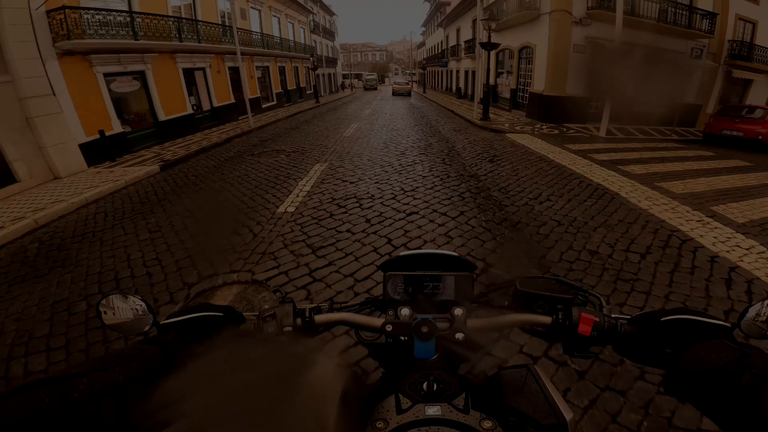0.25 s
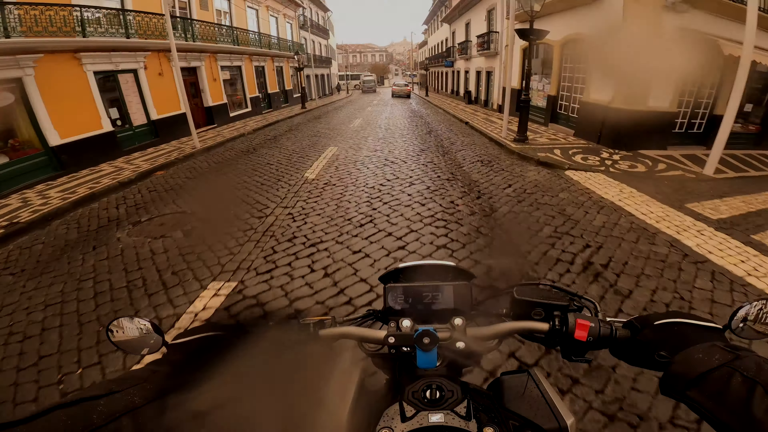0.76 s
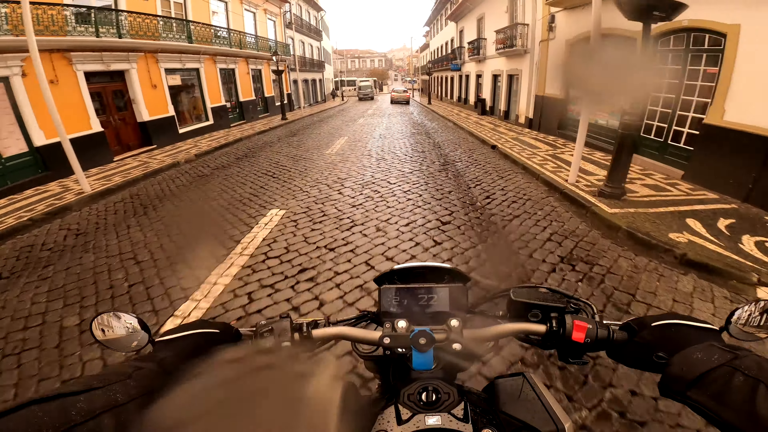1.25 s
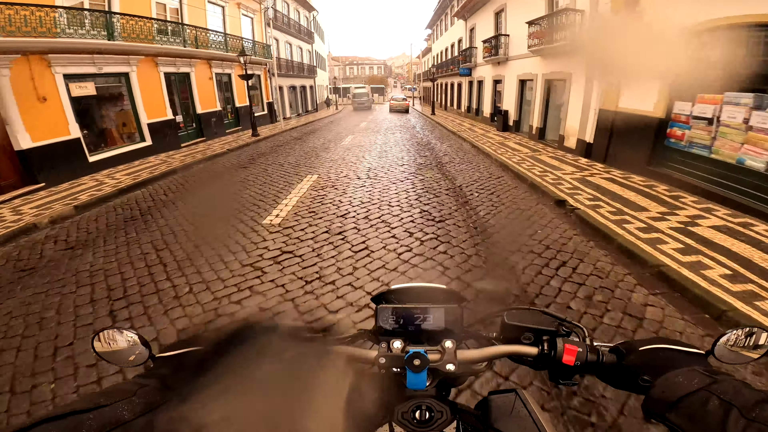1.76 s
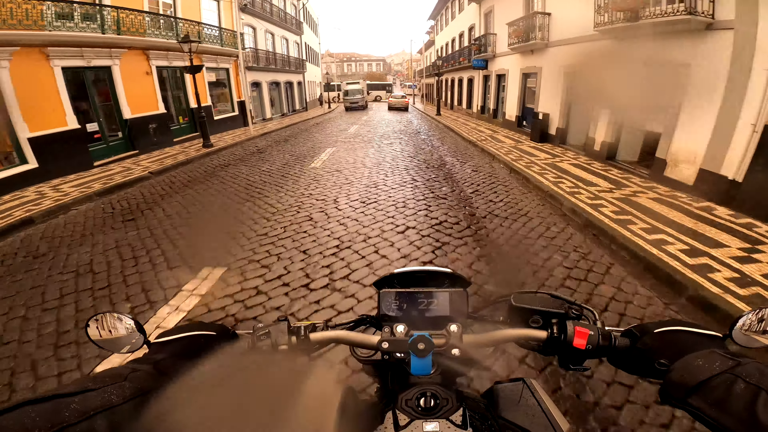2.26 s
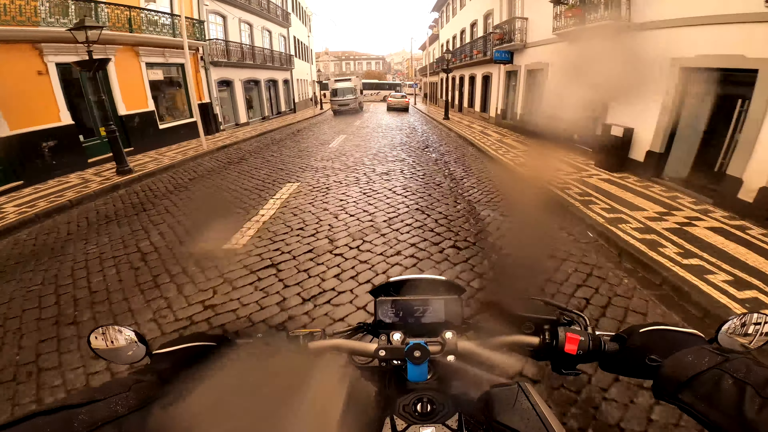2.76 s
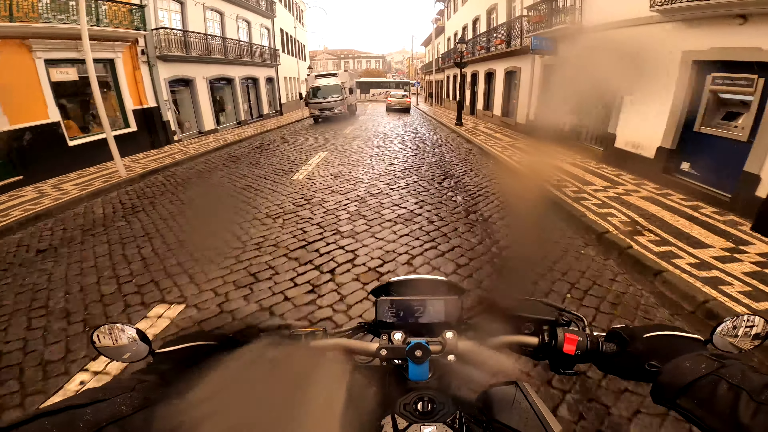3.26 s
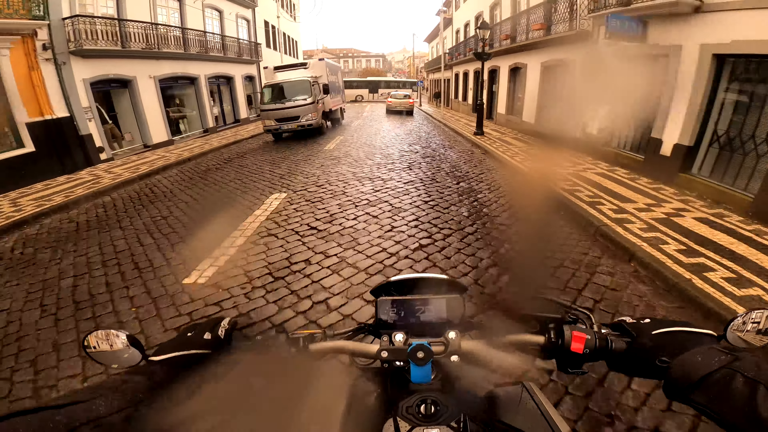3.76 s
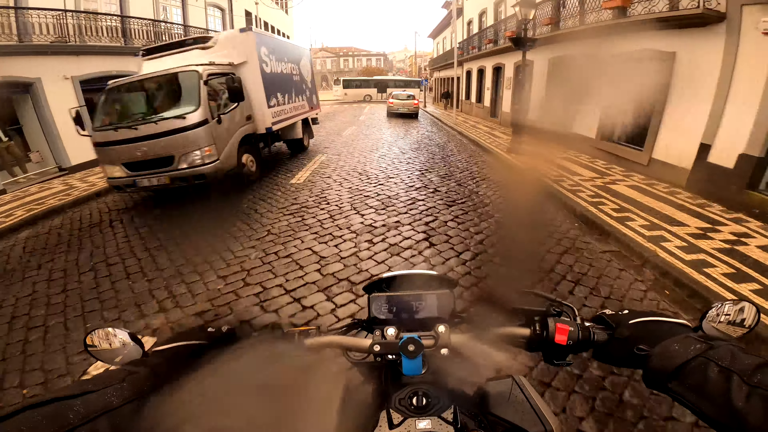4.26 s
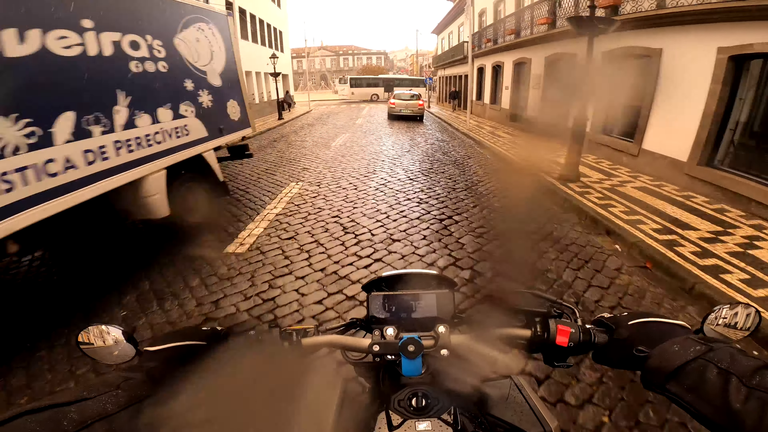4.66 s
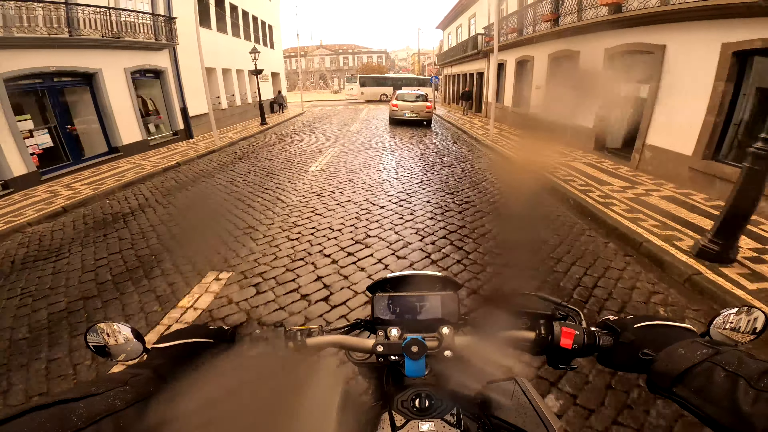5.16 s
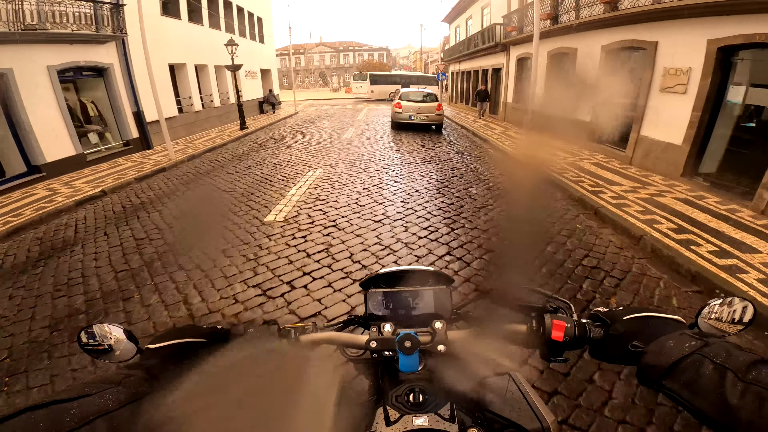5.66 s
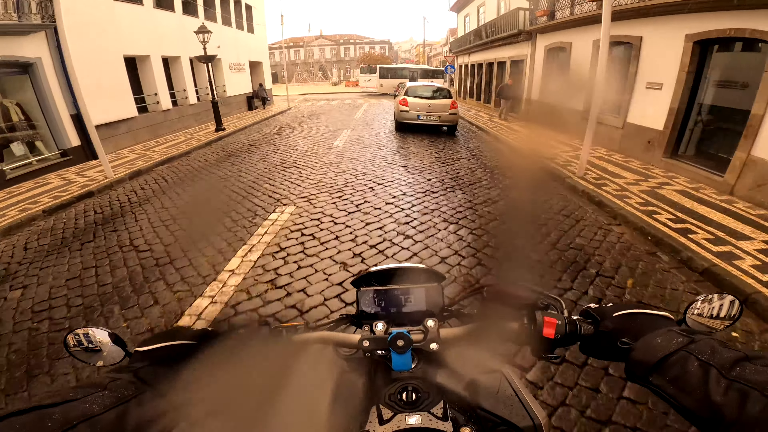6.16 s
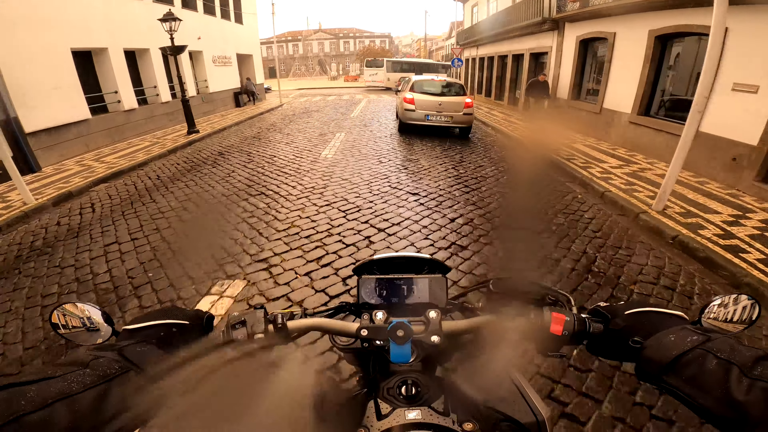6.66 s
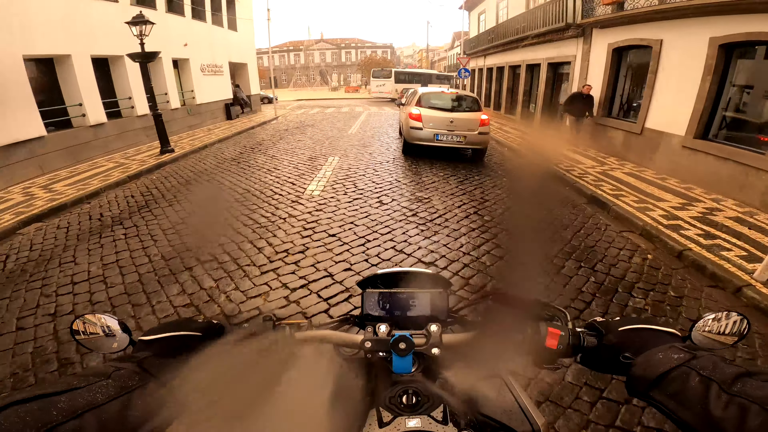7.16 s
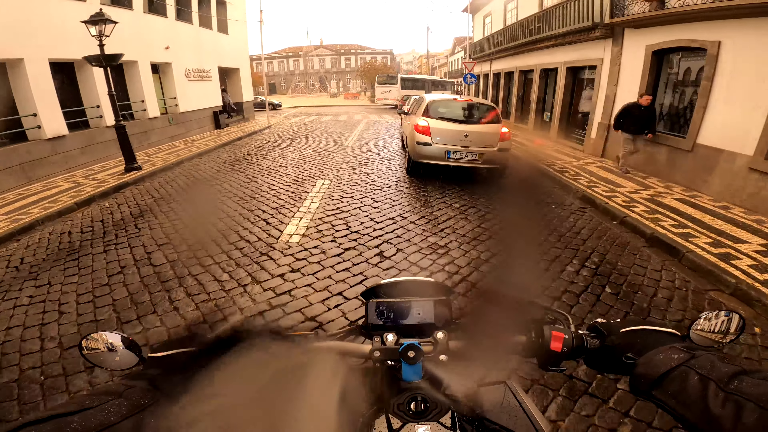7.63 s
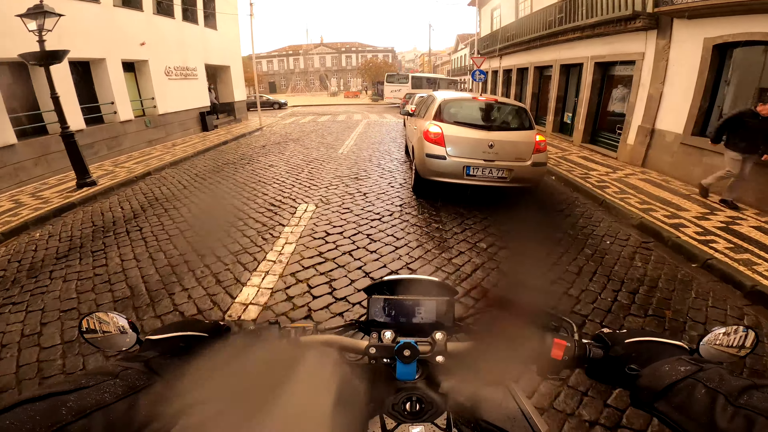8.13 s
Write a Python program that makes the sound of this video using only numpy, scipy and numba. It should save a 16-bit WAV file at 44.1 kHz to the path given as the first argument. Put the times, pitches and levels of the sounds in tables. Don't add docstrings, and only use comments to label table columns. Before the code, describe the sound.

A motorcycle thumps slowly along wet cobbles, tyres drumming and hissing, a brake squeaks, a diesel lorry roars past rattling, then the engine settles to idle.

```python
import sys
import numpy as np
from scipy import signal
from scipy.fft import rfft, irfft
from scipy.io import wavfile
from scipy.ndimage import uniform_filter1d, minimum_filter1d
from numba import njit

SR = 44100
rng = np.random.default_rng(int(sys.argv[2]) if len(sys.argv) > 2 else 0)


def generate_wav(sig):
    pcm = np.round(np.clip(np.atleast_2d(sig).T, -1, 1) * 32767).astype(np.int16)
    wavfile.write(sys.argv[1], SR, pcm)


def magnitude_from_level(level_db):
    exponent = np.asarray(level_db, float) / 20
    return 10 ** exponent


N = 370170
TIME = np.arange(N) / SR

# time in seconds, firing rate in Hz, effort in dB.
ENGINE = [(0, 66, -15.5), (.23, 69.5, -12.5), (.65, 69.8, -12.5), (.75, 67.54, -12), (.98, 72.07, -13),
          (1.1, 65.44, -14.5), (1.4, 73, -13), (1.94, 69.2, -13), (2.5, 69.2, -14.5), (2.9, 63.75, -13),
          (4.1, 62.22, -17), (4.4, 58.53, -12.5), (4.62, 53, -13.5), (4.9, 50.86, -11.5),
          (5.19, 41.33, -16.5), (6.56, 42, -15), (6.71, 40.46, -16), (8.39, 40.9, -14.5)]
# crest in seconds, swing in Hz.
CHAIN_SHUNT = [(-.01, 5), (.1, 8), (.21, 4), (.32, 8), (.445, 6), (.555, 4), (.645, 3), (.8, 2), (.915, 3),
               (1.0, 2), (1.105, 4), (1.21, 6), (1.315, 5), (1.41, 7), (1.51, 3), (1.62, 1), (1.715, 5),
               (1.8, 4), (1.9, 6), (2.01, 3), (2.12, 6), (2.21, 7), (2.3, 6), (2.405, 9), (2.51, 4),
               (2.63, 7), (2.74, 8), (2.85, 7), (2.97, 6), (3.08, 6), (3.18, 6), (3.3, 4), (3.43, 4),
               (3.55, 5), (3.65, 3), (3.77, 4), (3.9, 4), (4.01, 5), (4.13, 5), (4.27, 8), (4.4, 7),
               (4.56, 7), (4.69, 4), (4.82, 3), (4.96, 3), (5.1, 0)]
# centre in seconds, lift in Hz, length in seconds.
HUNTING = [
    (.42, -4, .2),
    (.6, 2.5, .12),
    (5.35, -.4, .3),
    (5.82, -.7, .15),
    (6.3, -.3, .5),
    (6.95, -.2, .3),
    (7.25, .8, .15),
    (7.88, .5, .15),
    (8.0, -.6, .1),
    (8.28, .9, .3),
]
# time in seconds, share from 0 to 1.
OUT_OF_STEP = [
    (1.75, 0),
    (2.05, 1),
    (2.7, 1),
    (2.85, .3),
    (3.4, .3),
    (3.6, 1),
    (5.0, 1),
    (5.3, 0),
]
# centre in seconds, depth in dB, length in seconds.
MISFIRES = [(1.115, 0.5, 0.042), (1.345, 2, 0.032), (2.02, 4, .04), (2.215, 5, 0.025), (2.33, 6, 0.026),
            (3.362, 0.5, .03), (3.5, 1.5, .1), (4.03, -1, 0.034), (4.165, 1.5, 0.065), (4.3, 5.5, 0.054),
            (4.42, 6, 0.044), (4.585, 9, 0.064), (4.89, 3.5, 0.087), (5.073, 2.5, 0.034),
            (5.168, 2.5, 0.046), (5.507, 5, 0.036), (5.797, 4, .06), (6.65, 3, 0.051), (7.308, 1.5, 0.038),
            (7.972, 5, 0.073)]
# centre in seconds, lift in dB, length in seconds.
BARKS = [(1.0, 5.5, 0.074), (1.28, 2, .06), (2.3, -1, .8), (2.933, 5.5, 0.035), (3.148, 3, .05),
         (3.397, 3.5, 0.088), (3.99, 4, .04), (4.1, 4.5, 0.086), (4.24, 5, .08), (4.36, 5.5, .08),
         (4.5, 4, 0.087), (4.68, 5, 0.099), (4.81, 1.5, 0.12), (4.96, 2.5, 0.043), (5.493, 10.5, 0.073),
         (6.42, 1, .1), (6.75, 8.5, 0.13), (7.079, 5.5, 0.078), (7.568, 2, 0.2), (8.03, 11.5, 0.09)]
# pitch in Hz, width in Hz, level at idle in dB.
UPPER_PIPE = [(166, 12, -52), (216, 15, -55), (258.2, 11, -38.5), (284.5, 10, -38)]
# time in seconds, level in dB, spray in dB.
ROLL = [
    (0, -29, -4.5),
    (2, -29, -4),
    (4.4, -27, -7.5),
    (5.6, -27, -16),
    (6.6, -30, -12),
    (8.39, -31.5, -6.5),
]
# frequency in Hz, density in dB per Hz.
DRUMMING = [(6, -3), (25, 4), (45, 7.5), (105, 7.5), (150, 3.5)]
# frequency in Hz, density in dB per Hz.
STONES = [(185, -3.5), (265, -1.5), (350, -9), (650, -11.5), (1000, -16.5), (2000, -23), (3300, -25),
          (5000, -34), (7800, -44.5), (15500, -76.5)]
# pitch in Hz, width in Hz.
RING_MODES = [(995, 55), (1400, 90), (1610, 62), (2600, 300), (2820, 150), (3140, 60), (3280, 140),
              (690, 160), (1200, 120), (3520, 260), (2150, 500)]
# level at idle in dB, gain in dB per Hz of firing rate above idle.
RING_LEVELS = [(-44, 0.02), (-50.5, -0.02), (-58.5, 0.4737), (-51.5, -0.0059), (-58.5, 0.2848), (-63, 0.4),
               (-55, -0.06), (-44, 0.0283), (-52.5, -0.1233), (-59.5, -0.0314), (-67.5, 0.4071)]
# start in seconds, end in seconds, pitch in Hz, level in dB.
BUZZES = [
    (.3, 0.61, 1394, -53),
    (1.973, 2.85, 1410, -44),
    (2.85, 3.7, 1368, -46),
    (2.8, 3.9, 1645, -54),
    (6.701, 7.703, 1694, -51),
    (7.401, 8.16, 1426, -44),
]
# start in seconds, peak in dB, pitch in Hz.
STONE_KNOCKS = [(2.535, -14, 620), (2.577, -22, 600), (4.573, -14, 260), (4.583, -16, 480),
                (4.609, -16, 440), (4.72, -17, 330), (4.891, -16, 420), (4.986, -15, 310),
                (5.124, -16, 290), (5.175, -18, 450), (5.24, -18, 400), (7.405, -18, 560)]
# pitch in Hz, width in Hz, level at idle in dB, gain in
# dB per Hz of firing rate above idle.
HOUSING = [(6840, 1100, -69.5, -0.16), (12000, 2600, -83.5, 0.17)]
# start in seconds, length in seconds, pitch in Hz, level in dB.
SQUEAK = [
    (2.735, .155, 3315, -42.5),
    (2.897, .068, 3340, -43),
    (2.973, .075, 3295, -43),
    (3.048, .085, 3365, -46.5),
]
# frequency in Hz, density in dB per Hz.
LORRY_COLOUR = [(120, -41), (220, -5), (450, -2), (1000, -10), (2860, -23.5), (5500, -32.5), (9000, -50.5),
                (15500, -64)]
# centre in seconds, lift in dB, length in seconds.
AXLES = [
    (4.6, 2, .11),
    (4.73, 3.5, 0.11),
    (4.89, -0.5, 0.057),
    (5.07, 3, .07),
    (5.17, 4, .08),
    (5.26, 4.5, .12),
]
# multiple of the firing rate, level when abreast in dB against the drone.
DIESEL_ORDERS = [(.5, -7.5), (1, 1), (2, -8), (3, -11), (4, -11.5)]
# start in seconds, peak in dB.
RATTLES = [(4.404, -42), (4.498, -42), (4.56, -43), (4.58, -40), (4.606, -31), (4.622, -34), (4.64, -37),
           (4.66, -39), (4.70, -40), (4.746, -39), (4.785, -38), (4.82, -40), (4.838, -39), (4.86, -41),
           (4.89, -39), (4.915, -35), (4.957, -39), (4.998, -40), (5.023, -42), (5.095, -39), (5.172, -42),
           (5.215, -40), (5.31, -44)]
# pitch in Hz, width in Hz, level in dB.
BODY = [(1380, 350, 5), (2100, 800, -7), (2900, 1000, -7), (5300, 1300, -17), (7500, 2500, -36)]
# start in seconds, peak in dB, pitch in Hz, ring in seconds.
CLANGS = [
    (4.606, -24, 1390, .006),
    (4.612, -33, 2700, .009),
    (4.697, -28, 1000, .004),
    (4.779, -28, 1000, .004),
    (4.785, -34, 2500, .003),
    (4.845, -24, 900, .003),
    (4.916, -33, 2900, .004),
    (4.918, -35, 3400, .004),
    (4.958, -29, 1200, .004),
]
# start in seconds, peak in dB, pitch in Hz.
DROPS = [
    (4.524, -58, 13500),
    (5.535, -52, 8700),
    (6.298, -58, 11000),
    (7.456, -50, 8600),
    (8.247, -60, 13000),
]

# starts, full, clutch in, settled (seconds)
OVERRUN_S = (1.7, 3.2, 5.0, 5.35)
IDLE_HZ = 41.5


def unit(x):
    return x / np.sqrt(np.mean(x ** 2))


def steady(x):
    return x / np.sqrt(uniform_filter1d(x ** 2, int(0.95 * SR)) + 1e-12)


def curves(table):
    s, *columns = np.transpose(table)
    return [np.interp(TIME, s, column) for column in columns]


def spells(table):
    return sum(lift * np.exp(-(2 * (TIME - s) / length) ** 2) for s, lift, length in table)


def window(start, end, smooth):
    return uniform_filter1d(1. * (TIME > start) * (TIME < end), size=smooth)


def decay(start, fall_s):
    return (TIME > start) * np.exp(-np.maximum(TIME - start, 0) / fall_s)


def walk(rate):
    k = int(SR / rate)
    held = np.repeat(rng.standard_normal(N // k + 1), k)
    return 0.846 * uniform_filter1d(uniform_filter1d(held, k), k)[:N]


@njit
def svf(x, hz, width):
    y, b, l = np.empty(len(x)), 0., 0.
    g, k = np.tan(np.pi * hz / SR), width / hz
    for i in range(len(x)):
        v = (b + g * (x[i] - l)) / (1 + g * (g + k))
        b, l, y[i] = 2 * v - b, l + 2 * g * v, k * v
    return y


def steep(x, hz, width):
    return svf(svf(x, 1. * hz, 1. * width), 1. * hz, 1.6 * width)


def wash(colour, shared_db, own_db, lift_db, lift_hz):
    hz_points, db_points = np.transpose(colour)
    freqs = np.fft.rfftfreq(N, 1 / SR)[1:]
    colour_db = np.interp(np.log(freqs), np.log(hz_points), db_points)
    spectrum = rfft(rng.standard_normal(N))[1:] * magnitude_from_level(colour_db)
    out = 0
    for hz in 7.8 * 2 ** np.arange(0, 11.5, .5):
        share = np.clip(1 - np.abs(2 * np.log2(freqs / hz)), 0, 1)
        db = shared_db + own_db * walk(10) + lift_db / (1 + (lift_hz / hz) ** 2)
        out = out + magnitude_from_level(db) * irfft(np.r_[0, spectrum * share], N)
    return out


def knock(s, db, hz, ring_s):
    age = np.maximum(TIME - s, 0)
    return magnitude_from_level(db + 6) * age / ring_s * np.exp(-age / ring_s) * np.sin(2 * np.pi * hz * age)


@njit
def fire(hz, scatter_db, scatter_len, step_db, limp, chance):
    pulses, phase, p, k = np.zeros(len(hz)), np.empty(len(hz)), 0., 0
    for i in range(len(hz)):
        p += hz[i] / (1 + scatter_len[i] * chance[k, 0] + limp[i] * (-1) ** k) / SR
        if p >= 1:
            p, k = p - 1, k + 1
            pulses[i] = 10 ** ((scatter_db[i] * chance[k, 1] + step_db[i] * (-1) ** k) / 20)
        phase[i] = p
    return pulses, phase


def pipe(pulses, hz, width):
    forward = steep(pulses, hz, 1.3 * width)
    flow = steep(forward[::-1].copy(), hz, 1.3 * width)[::-1]
    return -np.gradient(uniform_filter1d(flow, 60))


def engine():
    hz, thump_db = curves(ENGINE)
    in_gear = TIME < OVERRUN_S[2]
    lumpy = np.interp(TIME, OVERRUN_S, (0, 1, 1, 0))

    share_in_revs = .33
    crests, swing_hz = np.transpose(CHAIN_SHUNT)
    turns = np.interp(TIME, crests, np.arange(len(crests)))
    swing = np.interp(TIME, crests, swing_hz) * np.cos(2 * np.pi * turns)
    rocking_s = (1 - share_in_revs) * np.cumsum(swing / hz) / SR
    cobble_jolts = .8 * walk(12) * in_gear
    hz = hz + share_in_revs * swing + spells(HUNTING) + cobble_jolts

    out_of_step = curves(OUT_OF_STEP)[0]
    calm = np.interp(TIME, OVERRUN_S[2:], (1, .72))
    scatter_db = calm * (1.0 + lumpy * (1.3 - 1.0))
    scatter_len = calm * (.01 + lumpy * (.02 - .01))
    step_db = calm * (.6 + out_of_step * (2.2 - .6))
    limp = (.015 + out_of_step * in_gear * (.045 - .015)) * walk(9)
    chance = rng.standard_normal((N // 300, 2))
    pulses, phase = fire(hz, scatter_db, scatter_len, step_db, limp, chance)

    box = steady(pipe(pulses, 52, 52))
    box = np.interp(TIME + rocking_s - uniform_filter1d(rocking_s, size=SR // 3), TIME, box)
    tail = steady(pipe(pulses, 122, 42))
    tail = np.interp(TIME - .0009, TIME, tail)
    upper = sum(magnitude_from_level(db) * unit(pipe(pulses, f, width)) for f, width, db in UPPER_PIPE)
    upper = upper * magnitude_from_level(7.5 - 0.72 * (hz - 43.5))
    gas = unit(steep(np.exp(-phase / 1.1) * rng.standard_normal(N), 550, 1100))

    throb_db = 6.5 * walk(13) + 2.4 * spells(BARKS)
    tail_db = -12 - 1.5 * lumpy + (.5 + lumpy / 2) * throb_db
    effort = magnitude_from_level(thump_db - 1.9 * spells(MISFIRES))
    return effort * (box + magnitude_from_level(-32.0) * gas + upper + magnitude_from_level(tail_db) * tail)


def tyres():
    roll_db, spray_db = curves(ROLL)
    sound = wash(DRUMMING + STONES, .5 * walk(12), 1.1, lift_db=spray_db - 2.5, lift_hz=2680.)
    eased = 1 - magnitude_from_level(np.interp(TIME, OVERRUN_S[2:], (0, -3)))
    sound = sound - eased * svf(sound, 75., 130.)
    middle = svf(sound, 498.0, 1625.0)
    return magnitude_from_level(roll_db + 5.0) * sound / np.sqrt(np.mean(middle ** 2))


def road_knocks():
    hits = rng.random(N) < 800 / SR
    return hits * magnitude_from_level(1.8 * rng.exponential(size=N)) * rng.standard_normal(N)


def rings():
    revs = curves(ENGINE)[0] - IDLE_HZ
    flutter_db = 2.2
    out = 0
    for (hz, width), (db, per_hz) in zip(RING_MODES, RING_LEVELS):
        level = magnitude_from_level(db + per_hz * revs + flutter_db * walk(16))
        out = out + level * unit(steep(road_knocks(), hz, width))
    for start, end, hz, db in BUZZES:
        level = magnitude_from_level(db + flutter_db * walk(22)) * window(start, end, 5000)
        out = out + level * unit(steep(road_knocks(), hz, 48))
    return out + sum(knock(*row, .0014) for row in STONE_KNOCKS)


def air():
    hz, width = 9580, 6600
    hiss = steep(steep(rng.standard_normal(N), hz, width), hz, width)
    out = magnitude_from_level(-68 + .8 * walk(3.9)) * unit(hiss)
    revs = curves(ENGINE)[0] - IDLE_HZ
    for hz, width, db, per_hz in HOUSING:
        out = out + magnitude_from_level(db + per_hz * revs) * unit(steep(rng.standard_normal(N), hz, width))
    return out


def squeak():
    hz, gain = np.full(N, 3315.), np.zeros(N)
    for s, length, pitch_hz, db in SQUEAK:
        on = (TIME > s) & (TIME < s + length)
        hz = np.where(on, pitch_hz + 300 * (TIME - s), hz)
        gain = gain + on * magnitude_from_level(db)
    waver = 1 + .006 * walk(35) + .016 * walk(300)
    slip = 2 * np.pi * np.cumsum(hz * waver) / SR
    tone = np.sin(slip) + magnitude_from_level(-19.5) * np.sin(2 * slip)
    return uniform_filter1d(gain, size=700) * magnitude_from_level(3 + 2.5 * walk(70)) * tone


def bodywork():
    bumps = sum(magnitude_from_level(db) * decay(s, .016) for s, db in RATTLES)
    shaken = uniform_filter1d(bumps, size=160) * rng.standard_normal(N)
    rattle = sum(magnitude_from_level(db + 19) * steep(shaken, hz, width) for hz, width, db in BODY)
    return rattle + sum(knock(*row) for row in CLANGS)


def lorry():
    passes_s, closing_m_s, gap_m, abreast_db = 4.9, 7.4, 3.36, -24.5
    along = closing_m_s * (TIME - passes_s)
    metres = np.hypot(along, gap_m)
    bearing = along / metres
    distance_db = 20 * np.log10(metres / gap_m)
    axles_db = spells(AXLES)
    near_db = abreast_db - 1.87 * distance_db + axles_db

    front_spray_db, rear_spray_db = 6.5, -8.5
    spray_db = front_spray_db + (rear_spray_db - front_spray_db) * (1 + bearing) / 2
    spray_db = spray_db - window(4.58, 4.6, 6000)
    spray_db = spray_db - axles_db
    roar = unit(wash(LORRY_COLOUR, 1.0 * walk(25), 1.8, lift_db=spray_db, lift_hz=1500.))

    whistle_hz = 5330 * (1 - closing_m_s / 343 * bearing)
    turn = 2 * np.pi * np.cumsum(whistle_hz) / SR
    whistle = walk(350) * np.sin(turn) * magnitude_from_level(-35) * (1 - bearing)

    crank = 2 * np.pi * np.cumsum(69.2 * (1 + .006 * walk(5))) / SR
    drone = sum(magnitude_from_level(db + 1.8 * walk(10)) * np.sin(k * crank) for k, db in DIESEL_ORDERS)
    drone = drone * magnitude_from_level(abreast_db - .45 * distance_db)
    return (roar + whistle) * magnitude_from_level(near_db) + drone + bodywork()


def drops():
    out = 0
    for s, db, hz in DROPS:
        click = magnitude_from_level(db) * decay(s, .005) * rng.standard_normal(N)
        out = out + 5 * steep(click, hz, 1300) + .8 * steep(click, 11000, 8000)
    return out


def scene():
    return (engine() + tyres() + rings() + air() + squeak() + lorry() + drops())[None]


def low_pass(x):
    return signal.sosfilt(signal.butter(12, 15100, fs=SR, output="sos"), x)


def record(dry):
    peak = uniform_filter1d(-minimum_filter1d(-np.abs(dry), 2500), 2500)
    held = dry * np.minimum(1, 0.5 / peak) ** 0.28
    overload = 0.87
    rounded = np.tanh(overload * held) / overload
    fade_db = -7.5 * np.exp(-TIME / 0.42)
    return low_pass(rounded * magnitude_from_level(fade_db))


dry = scene()
out = record(dry)
generate_wav(out)
```